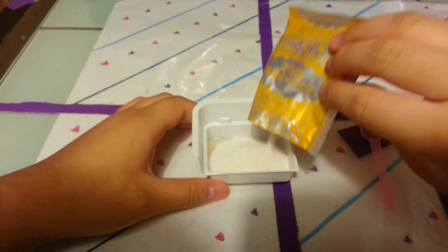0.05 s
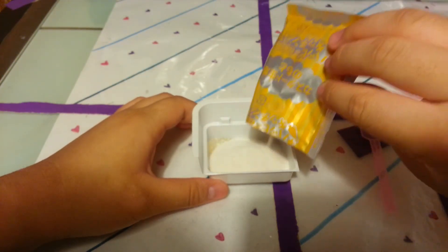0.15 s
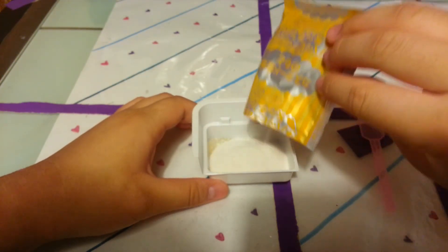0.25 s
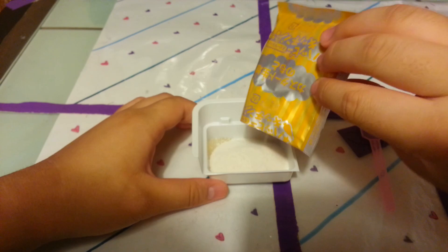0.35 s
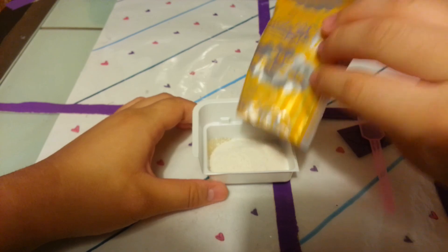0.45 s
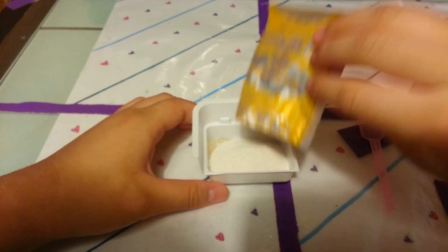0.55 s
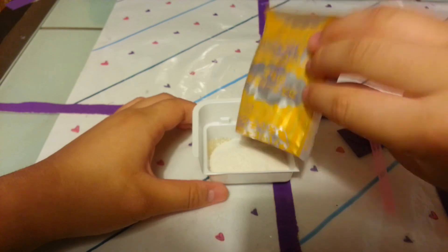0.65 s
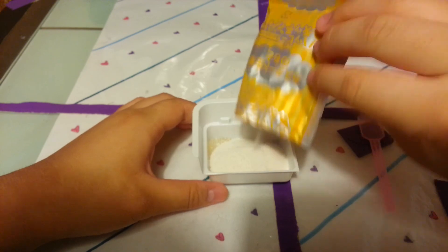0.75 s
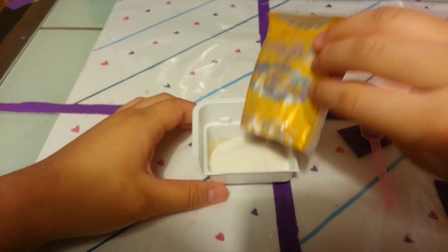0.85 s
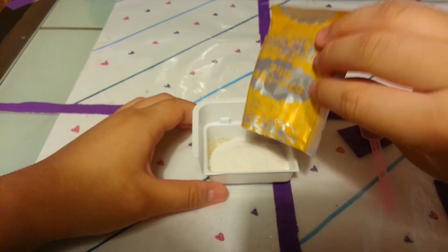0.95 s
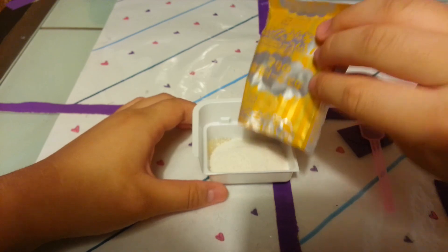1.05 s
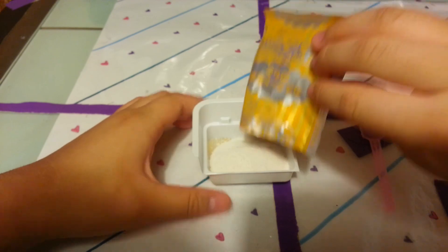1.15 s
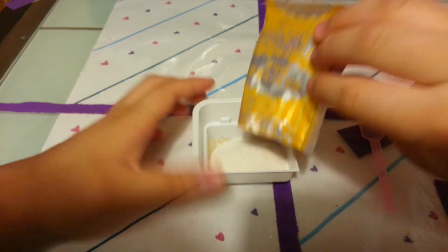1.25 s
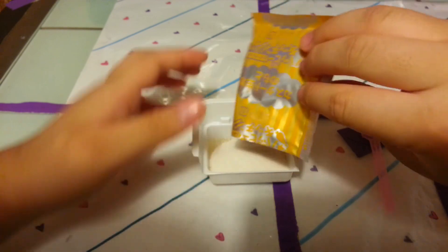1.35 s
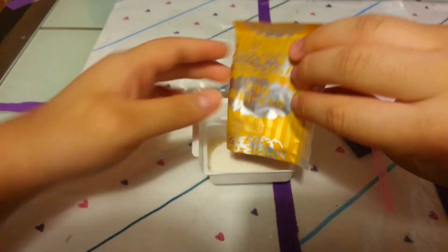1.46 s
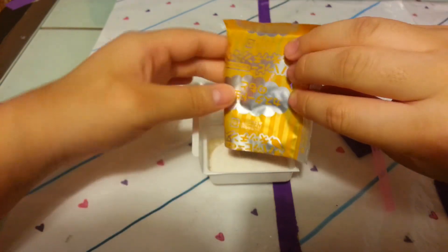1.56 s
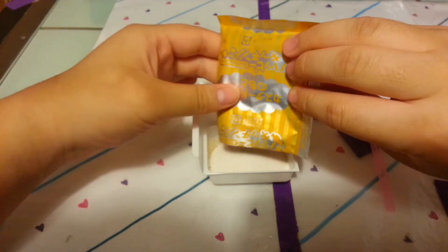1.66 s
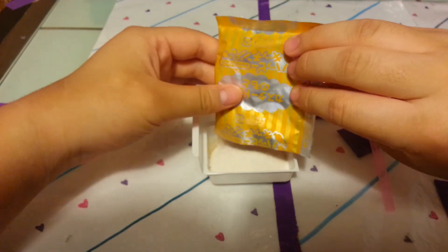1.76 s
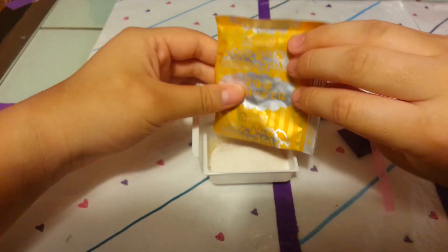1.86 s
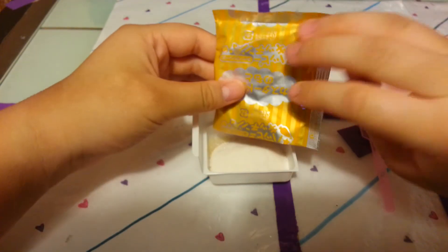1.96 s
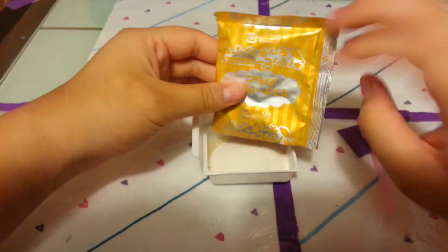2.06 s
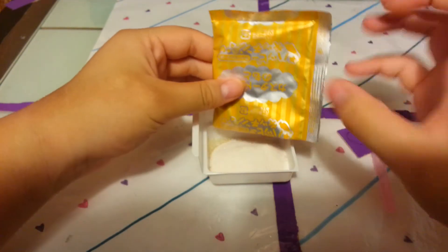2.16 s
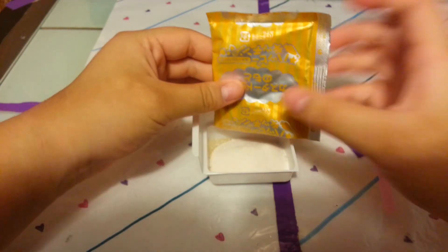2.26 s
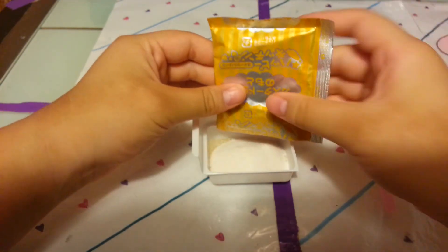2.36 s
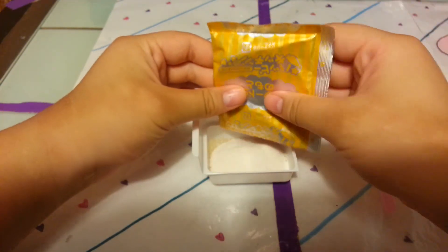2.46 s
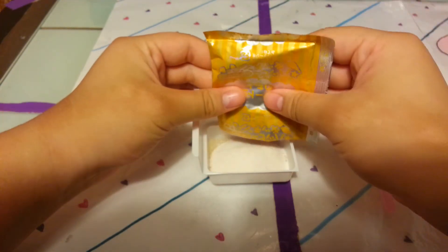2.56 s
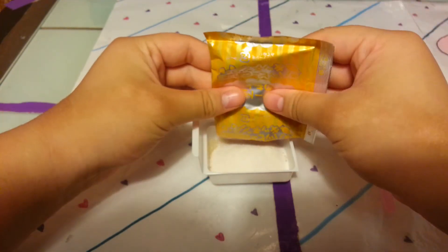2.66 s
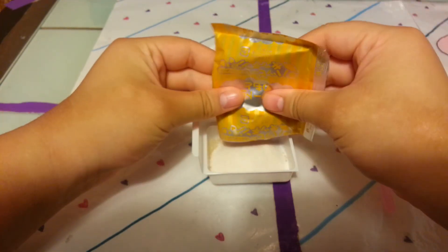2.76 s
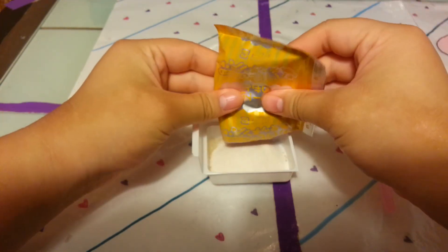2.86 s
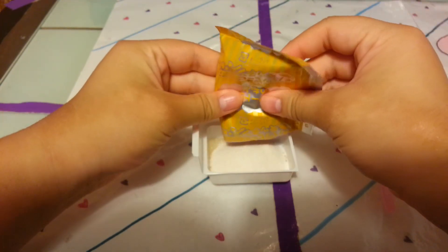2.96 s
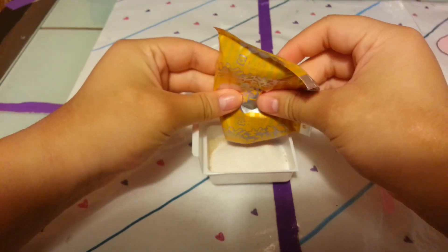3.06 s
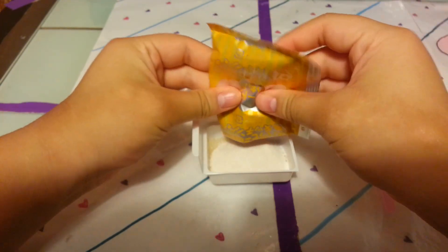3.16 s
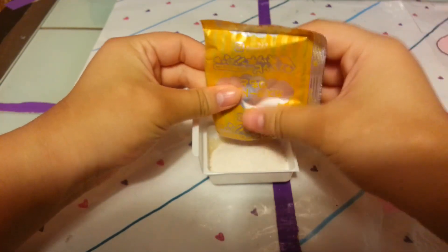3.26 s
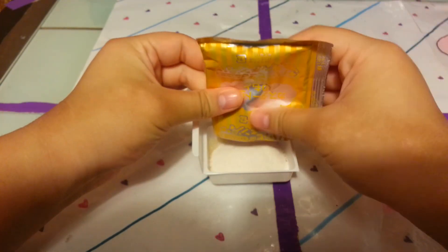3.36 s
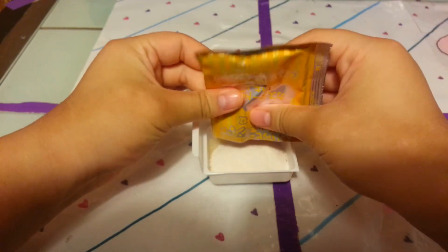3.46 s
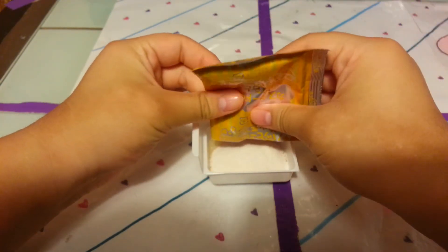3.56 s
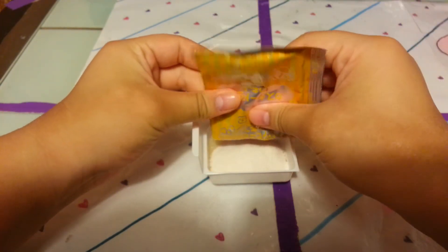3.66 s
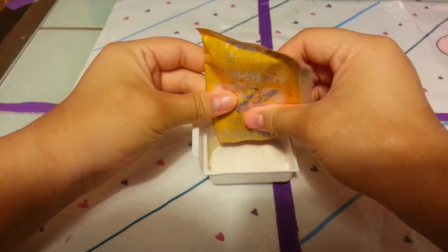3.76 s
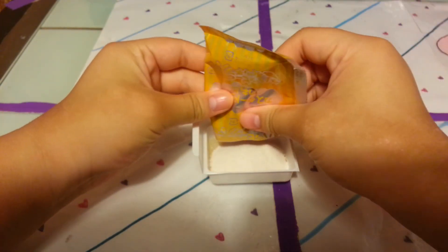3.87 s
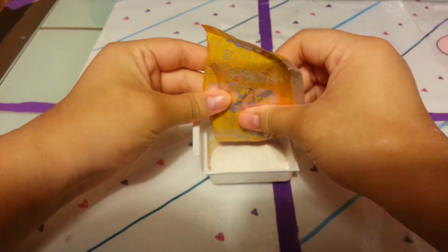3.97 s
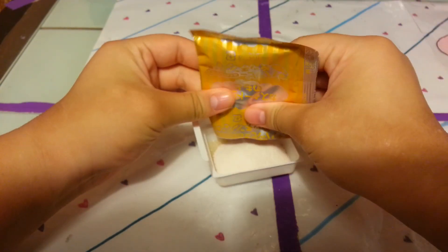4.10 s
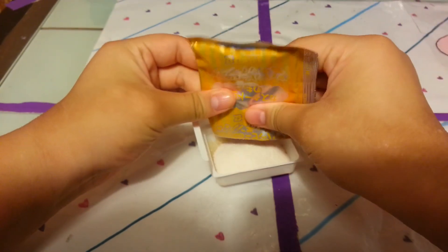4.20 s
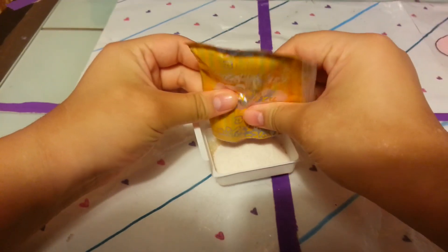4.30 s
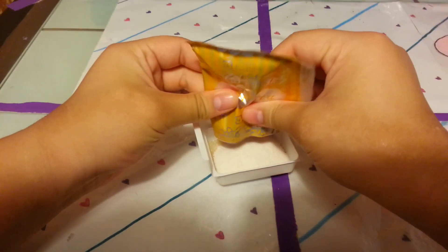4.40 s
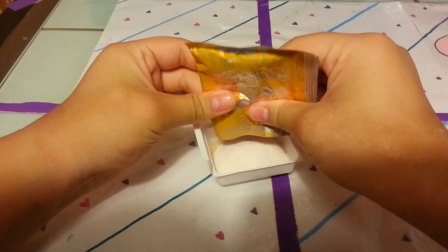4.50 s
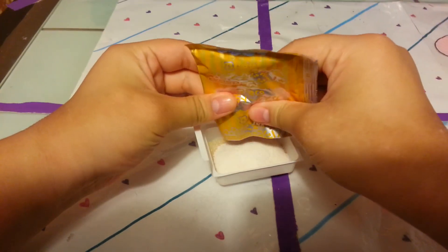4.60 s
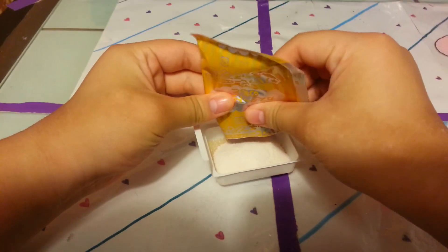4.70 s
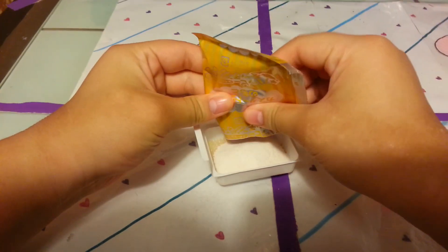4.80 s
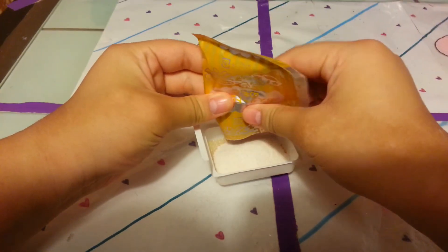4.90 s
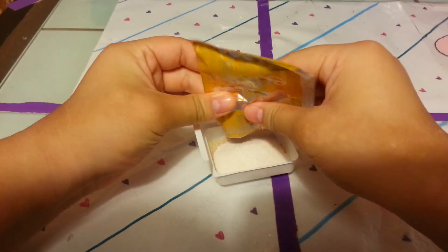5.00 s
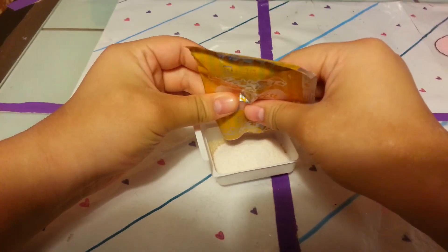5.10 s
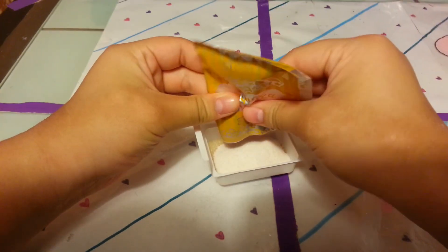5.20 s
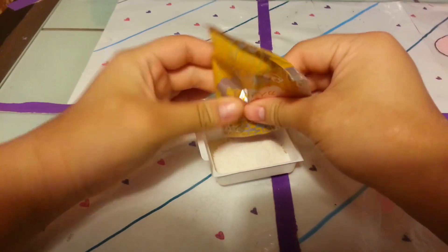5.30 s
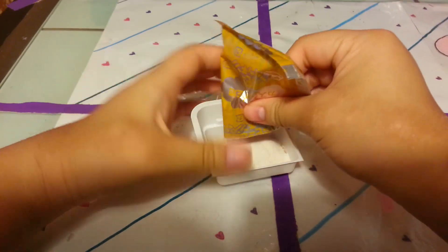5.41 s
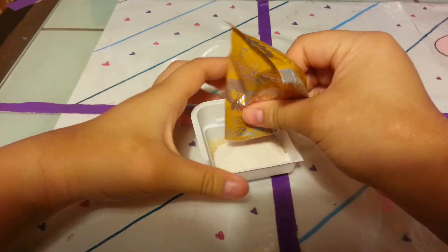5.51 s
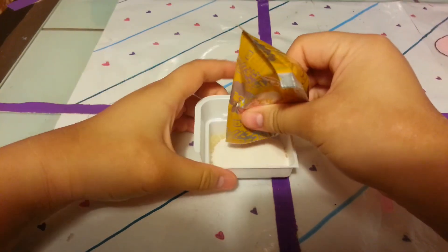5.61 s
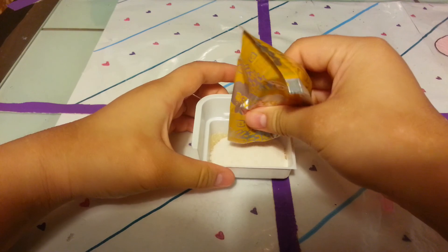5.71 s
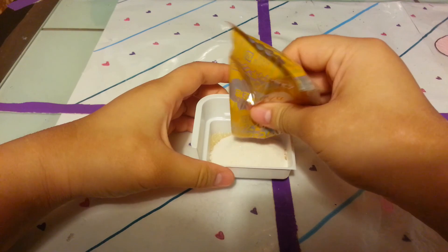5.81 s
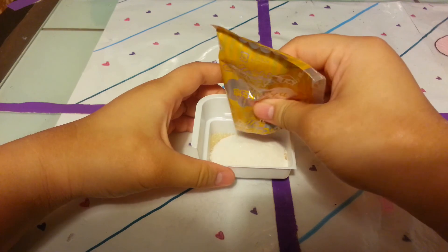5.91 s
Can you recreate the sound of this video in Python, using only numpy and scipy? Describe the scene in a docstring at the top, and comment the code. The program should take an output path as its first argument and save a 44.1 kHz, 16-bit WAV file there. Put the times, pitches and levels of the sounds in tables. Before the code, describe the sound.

A small foil sachet is gently shaken, then kneaded with bright snapping crackles and gritty hiss, close up in a quietly humming room.

```python
"""A small foil packet is shaken over a plastic tray, then kneaded stroke by stroke to empty out the last powder.
Rubbing walls are noise modulated by tiny stick-slip events; buckling creases are short, resonant noise bursts.
Knocks of the hands are damped sines, and a brush over the table cover is noise through resonances.
Around them lies a quiet room of short reverberation, with mains hum, a fan motor and a rush of air.
The close stereo microphone adds the resonances of its two ports, the sharpest on the right."""
import sys
import numpy as np
from scipy import signal
from scipy.fft import rfft, irfft
from scipy.io import wavfile

SR = 44100
rng = np.random.default_rng(int(sys.argv[2]) if len(sys.argv) > 2 else 0)


def master(y):
    """Save y as 16-bit WAV."""
    cut = np.clip(np.atleast_2d(y).T, -1, 1)
    pcm = np.round(cut * 32767)  # scale
    wavfile.write(sys.argv[1], SR, pcm.astype(np.int16))


N = 262306

FOIL_LIKENESS = 0.37  # share of the noise power of snaps and rustle common to both channels


def from_db(db):
    """Logarithmic level: decibels become an amplitude gain."""
    return 10 ** (np.asarray(db) / 20)


def rms_one(x):
    """Normalisation by mean power: scale to an rms of one."""
    return x / np.sqrt(np.mean(x ** 2) + 1e-20)


def in_time(rows):
    """Linear interpolation: the columns of a curve at every sample."""
    s, *columns = np.transpose(rows)
    return [np.interp(np.arange(N) / SR, s, column) for column in columns]


def drift(rate_hz):
    """Low-passed noise: a slow random fluctuation with a spread of one."""
    step = 20  # samples between the computed points
    pole = np.exp(-2 * np.pi * rate_hz * step / SR)
    warm_up = 2000
    noise = rng.standard_normal(N // step + 2 + warm_up)
    slow = signal.lfilter([1], [1, -2 * pole, pole * pole], noise)[warm_up:]
    return np.interp(np.arange(N) / step, np.arange(len(slow)), rms_one(slow))


def response(spectrum, size=2048):
    """Minimum phase: the causal, unit-energy impulse response of a spectrum, by its folded cepstrum."""
    hz, db = np.transpose(spectrum)
    grid_hz = np.maximum(np.arange(size // 2 + 1) * SR / size, 1)
    gain = from_db(np.interp(np.log(grid_hz), np.log(hz), db))
    cepstrum = irfft(np.log(gain))
    cepstrum[1:size // 2] *= 2
    cepstrum[size // 2 + 1:] = 0
    impulse = irfft(np.exp(rfft(cepstrum)))
    return rms_one(impulse) / np.sqrt(size)


def colour(x, impulse):
    """Convolution: filter both channels by one impulse response."""
    return signal.fftconvolve(x, impulse[None], axes=1)[:, :x.shape[1]]


def resonate(x, hz, width_hz, gain_db):
    """Second-order resonance: a peak on an otherwise flat response."""
    r = np.tan(np.pi * width_hz / SR)
    c = -2 * np.cos(2 * np.pi * hz / SR)
    g = from_db(gain_db)
    return signal.lfilter([1 + r * g, c, 1 - r * g], [1 + r, c, 1 - r], x)


def noise_pair(size, alike):
    """Partial coherence: two channels of white noise that share part of their power."""
    alike = np.clip(alike, 0, 1)
    shared = rng.standard_normal(size)
    separate = rng.standard_normal((2, size))
    return np.sqrt(alike) * shared + np.sqrt(1 - alike) * separate


# Lines of mains hum and a fan motor: f/Hz, level/dB (rms before the gain in BACKGROUND_LEVELS)
HUM_LINES = [(60, -74), (120, -60.5), (139.3, -58.5), (180, -61), (240, -65.5), (300, -63.5), (360, -65),
             (420, -60), (480, -68)]
# Spectral shape of the room air: f/Hz, relative density/dB
ROOM_AIR_SPECTRUM = [(20, -21), (60, -7), (95, -7), (150, 4.5), (300, -0.5), (480, 1.5), (700, -10),
                     (1100, -14.5), (1600, -18), (4000, -23), (14000, -37)]
# Background whose hum and air rise and fall, strongest around 1.5 s: t/s, hum gain/dB, air level/dB
BACKGROUND_LEVELS = [(0, -5.5, -57.5), (.45, -9.5, -63), (.8, -3.5, -55.5), (1.2, -8.5, -62.5),
                     (1.5, 2.5, -50.5), (2.0, -3, -58.5), (2.6, 1, -53.5), (5.95, 0, -53)]


def background(waver_db=2.5, wander_rad=0.3, air_alike=0.4, self_noise_db=-72):
    """Superposition: sines wavering in level and phase, the coloured rush of air, white microphone noise."""
    hum_gain_db, air_db = in_time(BACKGROUND_LEVELS)
    t = np.arange(N) / SR
    hum = 0
    for hz, db in HUM_LINES:
        level = from_db(db + waver_db * drift(4.1)) * np.sqrt(2)  # rms to peak
        phase = 2 * np.pi * (hz * t + rng.random()) + wander_rad * drift(0.66)
        hum = hum + level * np.sin(phase)
    air = rms_one(colour(noise_pair(N, air_alike), response(ROOM_AIR_SPECTRUM)))
    self_noise = from_db(self_noise_db) * noise_pair(N, 0)
    return from_db(hum_gain_db) * hum + from_db(air_db) * air + self_noise


SHAKE_S = 0.024  # how long the powder takes to gather speed and to settle
SHAKE_RUSTLE_DB = -3.5  # relative to the hiss
# Shakes of the packet, each sliding the powder inside: t/s of the middle, hiss level/dB
SHAKE_TIMES = [(.025, -62), (.135, -62), (.245, -66), (.325, -67), (.455, -71), (.59, -58), (.63, -63.5),
               (.765, -60.5), (.88, -59.5), (1.03, -64), (1.11, -65), (1.16, -68), (1.28, -60.5),
               (1.323, -54)]


def with_shakes(levels_db):
    """Addition of powers: each shake adds a bell-shaped swell of sliding powder to hiss and rustle."""
    t = np.arange(N) / SR
    power = 0
    for s, db in SHAKE_TIMES:
        bell = np.exp(-np.minimum(((t - s) / SHAKE_S) ** 2, 20))
        power = power + from_db(db) ** 2 * bell
    shaken = [power, power * from_db(SHAKE_RUSTLE_DB) ** 2]
    return 10 * np.log10(from_db(levels_db) ** 2 + shaken)


def grit(slips_per_s, spread_db, slip_s, smooth_share):
    """Stick-slip friction: the envelope of random, decaying slips of uneven size over even sliding."""
    sizes = from_db(spread_db * np.minimum(rng.exponential(1, N), 4))
    slips = (rng.random(N) < slips_per_s / SR) * sizes ** 2
    decay = np.exp(-1 / (slip_s * SR))
    power = signal.lfilter([1], [1, -decay], slips + 1e-18)
    share = np.clip(smooth_share, 0, 1)
    return np.sqrt(share + (1 - share) * power / power.mean())


# Broad resonances of the half-empty packet: f/Hz, width/Hz, peak gain/dB
PACKET_RESONANCES = [(500, 120, 8), (890, 75, 6), (2090, 670, 9.5), (2440, 67, 10), (4450, 270, 1.5)]


def packet(x):
    """Cavity resonance: the foil walls and the air between them colour the rustle."""
    for hz, width_hz, gain_db in PACKET_RESONANCES:
        x = resonate(x, hz, width_hz, gain_db)
    return x


# Spectral shape of foil on powder: f/Hz, relative density/dB
HISS_SPECTRUM = [(3000, -18), (5000, 1), (6500, 4), (8000, 5), (10000, 2), (13000, -4.5), (16000, -0.5)]
# Spectral shape of creases in the sheet, before the packet's resonances: f/Hz, relative density/dB
RUSTLE_SPECTRUM = [(100, -8), (260, 4), (450, 1), (700, -5.5), (1000, -2), (1500, -3.5), (2400, -6.5),
                   (3300, 4), (4600, 8), (6500, -1.5), (12000, -38)]


def rubbing(hiss_db, rustle_db, flicker_db=2.0, hiss_alike=0.3):
    """Granular friction: foil grinds on powder in a fine hiss, small creases give a coarser rustle."""
    fine = grit(slips_per_s=1500, spread_db=4.5, slip_s=0.00058, smooth_share=0.54)
    coarse = grit(slips_per_s=680, spread_db=5.0, slip_s=0.0015, smooth_share=0.67)
    hiss = rms_one(colour(fine * noise_pair(N, hiss_alike), response(HISS_SPECTRUM)))
    # the rustle partly follows the fine slips
    creasing = coarse * np.sqrt(fine) * noise_pair(N, FOIL_LIKENESS)
    rustle = rms_one(packet(colour(creasing, response(RUSTLE_SPECTRUM))))
    pressure = from_db(flicker_db * drift(51))
    return pressure * (from_db(hiss_db) * hiss + from_db(rustle_db) * rustle)


THIN_OVER_HISS_DB = 3.5  # relative to the hiss
THIN_HISS_DB = (-68, -58.5)  # softest, loudest
# Spectral shape of the faint thin hiss: f/Hz, relative density/dB
THIN_HISS_SPECTRUM = [(2000, -13), (3300, -22), (3900, -7), (4700, -11), (5400, 0), (5900, -6.5),
                      (6500, -13), (9000, -15), (15000, -18.5)]


def light_touch(hiss_db):
    """Saturation: a thin hiss, independent in each channel, soon stops growing with the movement."""
    level_db = np.clip(hiss_db + THIN_OVER_HISS_DB, *THIN_HISS_DB)
    return from_db(level_db) * rms_one(colour(noise_pair(N, 0), response(THIN_HISS_SPECTRUM)))


# Spectral shapes of the air pop, the flipping panel and the crack: f/Hz, relative density/dB
POP_SPECTRUM = [(80, -27.5), (300, 14.5), (500, 12.5), (1300, 10), (2200, -6), (6000, -60)]
PANEL_SPECTRUM = [(500, -13.5), (1500, -1), (2400, 6.5), (4600, 4), (6500, 5.5), (14000, -11.5)]
CRACK_SPECTRUM = [(2500, -22), (5000, -2), (6500, -0.5), (8000, 1.5), (10000, -9.5), (13000, -13),
                  (16000, -38)]
# Distinct single bucklings, the loudest and some faint isolated ones; the first row only adds a faint crackle
# to the hand knock at 0.778 s: # t/s, panel f/Hz, pop level/dB, panel level/dB, crack level/dB # (levels as rms
# over 3 ms, before the trims and the scatter in snaps)
SINGLE_SNAPS = [(0.7777, 1810, -42, -47.5, -54), (1.3374, 2970, -38, -33.5, -58),
                (1.502, 2450, -34, -42, -46), (1.5158, 3860, -38, -27.5, -28),
                (1.5363, 2200, -52, -48, -39), (1.5511, 1570, -37, -25, -51),
                (1.5584, 1670, -27.5, -33, -28.5), (1.6134, 4580, -33, -22.5, -28.5),
                (1.7324, 3300, -38, -34, -37), (1.7381, 4000, -45, -35, -39), (1.76, 2230, -44, -34.5, -63),
                (1.7805, 1480, -50, -39, -69), (1.951, 4900, -37.5, -35.5, -39.5),
                (2.0351, 4307, -46, -26.5, -71), (2.1352, 3700, -56, -29.5, -47),
                (2.1727, 2180, -36.5, -36.5, -41), (2.258, 4540, -48, -23.5, -36),
                (2.2679, 4800, -35.5, -22, -45), (2.2816, 4840, -37.5, -23, -24),
                (2.359, 3670, -31.5, -30, -31), (2.3883, 3180, -37, -30, -18.5),
                (2.396, 3500, -38, -21.5, -29), (2.418, 1560, -43, -21.5, -37),
                (2.4242, 4400, -55, -19.5, -18), (2.4741, 3200, -34, -26, -38),
                (2.5572, 2350, -50, -27, -19.5), (2.5689, 3530, -51, -45, -20.5),
                (2.6221, 3500, -27, -36, -28), (2.668, 4493, -46, -36, -17),
                (2.7187, 4350, -53, -32.5, -25), (2.7866, 4420, -36, -24.5, -25),
                (2.9045, 1874, -25.5, -29.5, -21), (2.9221, 2024, -59, -21, -21.5),
                (3.044, 4028, -38, -19.5, -26), (3.0701, 4960, -23.5, -20.5, -19),
                (3.1574, 2450, -61, -24, -44), (3.214, 3200, -31.5, -11, -23),
                (3.2536, 1504, -30, -32, -37), (3.272, 2440, -39, -36, -27.5),
                (3.3093, 3680, -37, -28.5, -18), (3.3506, 4423, -62, -47, -19),
                (3.4661, 3780, -40, -35, -27), (3.4811, 3364, -35.5, -25.5, -17.5),
                (3.5452, 4450, -47, -40, -24.5), (3.6256, 2745, -39, -31, -23.5),
                (3.6569, 4394, -59, -46, -19.5), (3.7291, 2646, -51, -30, -19.5),
                (3.755, 3990, -35, -20, -26), (3.851, 4430, -41, -22, -17.5),
                (3.9138, 1688, -32.5, -30.5, -37), (3.9657, 4556, -54, -31, -17.5),
                (4.0135, 4730, -48, -30, -24.5), (4.0416, 2500, -28, -19, -41),
                (4.074, 2760, -28, -26, -31), (4.1138, 2832, -31, -21, -43), (4.1705, 2860, -34, -32, -23),
                (4.1828, 4160, -32, -21.5, -22.5), (4.2229, 4310, -34, -28.5, -20),
                (4.352, 2870, -31, -27, -24), (4.3655, 4406, -53, -25, -17.5),
                (4.3922, 4460, -30.5, -19.5, -26), (4.4671, 3500, -38, -42, -29),
                (4.4823, 2055, -32, -30.5, -25.5), (4.5373, 2670, -43, -21.5, -16),
                (4.5908, 4156, -44, -40, -27), (4.6175, 4365, -57, -27.5, -22.5),
                (4.7721, 3770, -35.5, -32.5, -36), (4.7983, 2270, -38, -27.5, -58),
                (4.9174, 4490, -32.5, -21.5, -25), (4.9397, 4585, -43, -38, -22.5),
                (4.985, 4774, -30.5, -32, -32), (5.0656, 2223, -33, -27, -50),
                (5.1726, 2060, -30, -27.5, -25.5), (5.216, 4340, -35, -36, -29),
                (5.2257, 2930, -29, -32, -31), (5.2462, 4498, -53, -28.5, -44),
                (5.377, 3254, -44, -28, -30), (5.3905, 3551, -39, -28, -17),
                (5.3998, 1680, -39, -30.5, -47), (5.4763, 4073, -40, -49, -20.5),
                (5.7136, 4223, -53, -31.5, -22.5), (5.7632, 4570, -45, -28, -41),
                (5.8392, 4910, -62, -46, -20.5), (5.929, 4890, -61, -25, -25)]


def snaps(rows, pop_s=0.0011, panel_s=0.0014, crack_s=0.00052, scatter_db=1.34, size=2048):
    """Snap-through buckling: a crease cracks, the panel beside it flips, rings and pushes a pop of air."""
    pop_trim_db, panel_trim_db, crack_trim_db = -4.5, -0.5, -1.07
    out = np.zeros((2, N + size))
    t = np.arange(size) / SR
    window = 0.003 * SR  # samples over which the levels count
    pop, panel, crack = response(POP_SPECTRUM), response(PANEL_SPECTRUM), response(CRACK_SPECTRUM)

    def burst(decay_s, impulse):
        """Avalanche: noise with a quick rise and an exponential decay stands for many tiny slips."""
        envelope = np.exp(-t / decay_s) * (1 - np.exp(-2 * t / decay_s))
        return colour(noise_pair(size, FOIL_LIKENESS) * envelope, impulse)

    for s, hz, pop_db, panel_db, crack_db in rows:
        flip = resonate(burst(panel_s, panel), hz, width_hz=420, gain_db=12.5)
        # the pocket of air has another shape at every squeeze
        pocket_hz = rng.uniform(430, 1650)
        puff = resonate(burst(pop_s, pop), pocket_hz, width_hz=180, gain_db=6)
        snap = from_db(pop_db + pop_trim_db) * rms_one(puff)
        snap = snap + from_db(panel_db + panel_trim_db) * rms_one(flip)
        snap = snap + from_db(crack_db + crack_trim_db) * rms_one(burst(crack_s, crack))
        # creases lie all over the packet and face the ports differently
        facing = from_db(scatter_db * rng.standard_normal() * np.array([[-1], [1]]))
        at = round(s * SR)
        out[:, at:at + size] += facing * snap * np.sqrt(window / size)
    return out[:, :N]


# Soft knocks of the hands on table and packet: t/s, f/Hz, level/dB (undamped amplitude), t60/s
HAND_KNOCKS = [(0.778, 650, -34, 0.0082), (1.338, 169, -17.5, 0.015), (2.622, 536, -48, 0.059),
               (3.070, 400, -22, 0.017), (3.627, 503, -31, 0.034), (4.040, 521, -26.5, 0.036),
               (4.392, 472.5, -25, 0.028), (4.591, 838, -29, 0.026)]


def knocks(low_cut_hz=85):
    """Damped oscillation: exponentially decaying sines, high-passed to leave out deep bass."""
    out = np.zeros(N)
    for s, hz, db, t60_s in HAND_KNOCKS:
        t = np.maximum(np.arange(N) / SR - s, 0)
        decay = np.exp(-np.minimum(np.log(1000) * t / t60_s, 20))
        out += from_db(db) * np.sin(2 * np.pi * hz * t) * decay
    return signal.sosfilt(signal.butter(2, low_cut_hz, "high", fs=SR, output="sos"), out)


# The left hand lets go of the tray and brushes over the table cover: t/s, level/dB before flicker and pan
BRUSH_LEVELS = [(0, -100), (1.25, -94), (1.333, -59), (1.345, -40.5), (1.38, -43.5), (1.47, -48.5),
                (1.55, -48), (1.62, -57), (1.72, -53), (1.8, -100)]
# Resonances of the brushed cover and tray: f/Hz, width/Hz, relative level/dB
BRUSH_RESONANCES = [(950, 220, 4), (2150, 540, 2.5), (2420, 300, -8), (2910, 130, 5), (3780, 200, 5.5),
                    (4100, 140, 3), (5300, 390, -16), (6750, 350, -19)]


def brush(pan_db=4.5, flicker_db=1.0):
    """Friction-driven resonance: skin on plastic is even noise through parallel band-pass modes."""
    level_db, = in_time(BRUSH_LEVELS)
    friction = noise_pair(N, 0.42)
    sliding = 0
    for hz, width_hz, db in BRUSH_RESONANCES:
        b, a = signal.iirpeak(hz, hz / width_hz, fs=SR)
        sliding = sliding + from_db(db) * signal.lfilter(b, a, friction)
    level = from_db(level_db + flicker_db * drift(40))
    return rms_one(sliding) * level * from_db([[-pan_db], [pan_db]])


ATTACK_S, RELEASE_DB_PER_S = 0.02, 330  # friction builds up, then dies away as the finger stops
RESTING_DB = (-94, -73)  # (hiss, rustle) of the packet merely held
# Strokes of the fingers: t/s of the start, length/s, gritty hiss level/dB, rustle level/dB
FINGER_STROKES = [(1.491, 0.06, -57, -43), (1.598, 0.023, -48, -40), (1.72, 0.034, -60, -44),
                  (1.867, 0.07, -56, -51), (2.016, .03, -65, -47), (2.121, 0.019, -54, -49),
                  (2.258, 0.065, -54, -44), (2.36, 0.11, -41, -40), (2.484, 0.038, -40, -47),
                  (2.535, 0.2, -36, -42), (2.755, 0.078, -35.5, -38.5), (2.865, 0.062, -38, -42),
                  (2.968, 0.055, -36.5, -43.5), (3.027, 0.056, -34.5, -38), (3.129, 0.087, -38.5, -39.5),
                  (3.246, 0.13, -42.5, -46), (3.396, 0.055, -39.5, -51), (3.49, 0.049, -34.5, -39.5),
                  (3.522, 0.12, -32.5, -35.5), (3.668, 0.04, -37.5, -44), (3.741, 0.061, -36.5, -40),
                  (3.847, 0.065, -41, -45), (3.892, 0.079, -28, -34), (3.989, 0.096, -38.5, -39.5),
                  (4.098, .125, -36.5, -41.5), (4.288, 0.074, -33.5, -40), (4.398, 0.13, -43, -43),
                  (4.548, 0.066, -30.5, -34.5), (4.727, 0.099, -51, -52.5), (4.836, 0.048, -38.5, -49),
                  (4.883, 0.058, -35, -36.5), (5.014, 0.17, -36.5, -42), (5.187, 0.046, -33, -35),
                  (5.259, 0.17, -36.5, -44), (5.42, 0.066, -36, -42.5), (5.544, 0.095, -34.5, -41),
                  (5.649, 0.13, -32.5, -38.5), (5.814, 0.15, -34.5, -41.5)]


def stroke_levels():
    """Addition of powers: hiss and rustle in dB as every stroke swells, holds and dies away."""
    t = np.arange(N) / SR
    power = from_db(RESTING_DB)[:, None] ** 2 * np.ones(N)
    for s, length_s, *levels_db in FINGER_STROKES:
        near = slice(int(s * SR), int((s + length_s + 0.5) * SR))
        age = t[near] - s
        attack = np.clip(age / ATTACK_S, 0, 1)
        release = from_db(-RELEASE_DB_PER_S * np.maximum(age - length_s, 0))
        power[:, near] += (from_db(levels_db)[:, None] * attack * release) ** 2
    return 10 * np.log10(power)


CREASES_PER_S, BUCKLING_DB = 64, -45  # full rate; rustle level at which half of it is reached
CREASE_PITCH_HZ = (1560, 5300)  # lowest, highest
CREASE_DB, CREASE_SPREAD_DB = (-48, -39.5, -36.5), 4  # (pop, panel, crack) at FIRM_STROKE_DB, before trims
FIRM_STROKE_DB, CREASE_FOLLOWS = -40, 0.66  # rustle level; share of the stroke's swing in dB


def creases(rustle_db, count=360):
    """Threshold process: small random bucklings, denser and louder with the rustle, as rows for snaps."""
    chance = rng.random((count, 2))
    scatter = rng.standard_normal((count, 3))
    rate = CREASES_PER_S / (1 + from_db(BUCKLING_DB - rustle_db) ** 2)
    due = np.cumsum(rate) / SR  # how many creases are expected so far
    moments = np.searchsorted(due, np.arange(count) + 2 * chance[:, 0])
    pitches = np.interp(chance[:, 1], [0, 1], CREASE_PITCH_HZ)
    levels = np.array(CREASE_DB) + CREASE_SPREAD_DB * np.clip(scatter, -2, 2)
    effort_db = CREASE_FOLLOWS * (rustle_db - FIRM_STROKE_DB)
    rows = []
    for at, hz, db in zip(moments, pitches, levels):
        if at < N:
            rows.append((at / SR, hz, *(db + effort_db[at])))
    return rows


ROOM_T60_S, ROOM_DB = 0.24, -18  # decay time and energy level of the diffuse tail
# Reflections of table top and hands: delay/ms on the right (7 % longer on the left), level/dB
NEAR_ECHOES = [(1.4, -22.5), (2.6, -18), (7.2, -29)]


def room(x):
    """Reverberation: early reflections within milliseconds, then an exponentially decaying diffuse tail."""
    t = np.arange(int(ROOM_T60_S * SR)) / SR
    envelope = np.exp(-np.log(1000) * t / ROOM_T60_S) * (1 - np.exp(-t / 0.003))
    tail = noise_pair(len(t), 0.27) * envelope
    tail = signal.sosfilt(signal.butter(1, 7000, fs=SR, output="sos"), tail)
    impulse = from_db(ROOM_DB) * rms_one(tail) / np.sqrt(len(t))
    impulse[:, 0] += 1  # direct sound
    for ms, db in NEAR_ECHOES:
        # each port sees a slightly different path
        delays = (ms * SR / 1000 * np.array([1.07, 1])).astype(int)
        impulse[[0, 1], delays] += from_db(db)
    return signal.fftconvolve(x, impulse, axes=1)[:, :N]


FOIL_PAN_DB, PAN_DB = 0.84, 0.03  # foil alone, whole sound: right raised and left lowered by this much
LEFT_LAG = 2  # samples


def scene():
    """Level and time difference: the foil sounds a little to the right, and the left channel lags."""
    strokes_db = stroke_levels()
    hiss_db, rustle_db = with_shakes(strokes_db)
    buckling = snaps(list(SINGLE_SNAPS) + creases(strokes_db[1]))
    foil = (buckling + rubbing(hiss_db, rustle_db)) * from_db([[-FOIL_PAN_DB], [FOIL_PAN_DB]])
    sound = room(foil + light_touch(hiss_db) + brush() + knocks()) + background()
    left = np.pad(sound[0], (LEFT_LAG, 0))[:N]
    return np.array([left * from_db(-PAN_DB), sound[1] * from_db(PAN_DB)])


CUTOFF_HZ = 14700
# Resonances of the two microphone ports: f/Hz, width/Hz, peak gain/dB
LEFT_PORT_RESONANCES = [(2750, 3500, 1), (5650, 460, 7)]
RIGHT_PORT_RESONANCES = [(1283, 74, 7.3), (3430, 140, 2), (7134, 730, 12.83), (8110, 1200, 2.5),
                         (11660, 1450, 5.5)]


def record(dry):
    """Port resonance, overload and band limiting: the ports ring, the highest peaks clip, the top is cut."""
    out = []
    for x, port in zip(dry, (LEFT_PORT_RESONANCES, RIGHT_PORT_RESONANCES)):
        for hz, width_hz, gain_db in port:
            x = resonate(x, hz, width_hz, gain_db)
        out.append(x)
    clipped = np.clip(out, -0.88, 0.88)
    return signal.sosfilt(signal.ellip(8, 0.3, 70, CUTOFF_HZ, fs=SR, output="sos"), clipped)


dry = scene()
out = record(dry)
master(out)
```